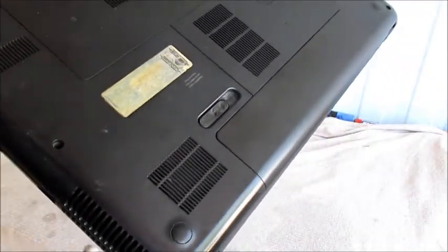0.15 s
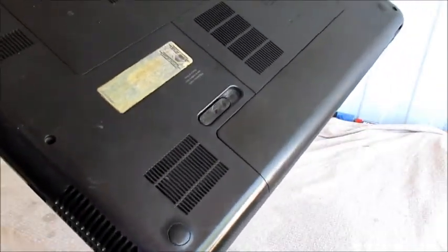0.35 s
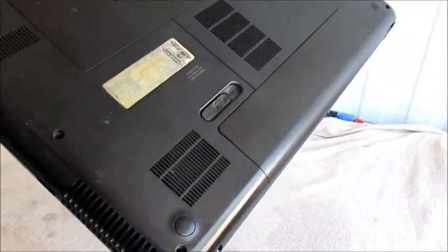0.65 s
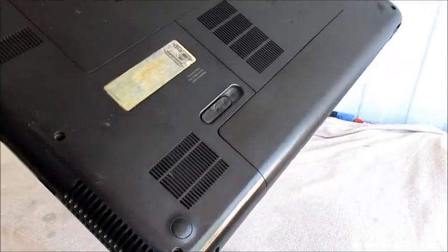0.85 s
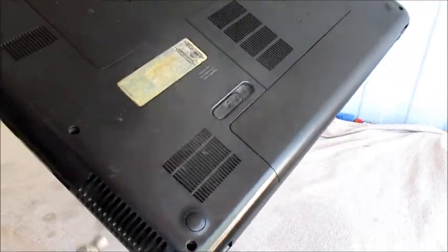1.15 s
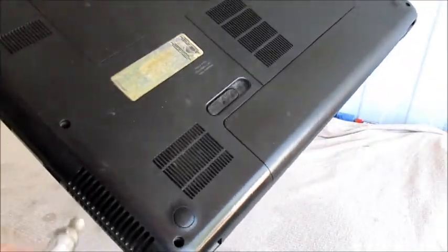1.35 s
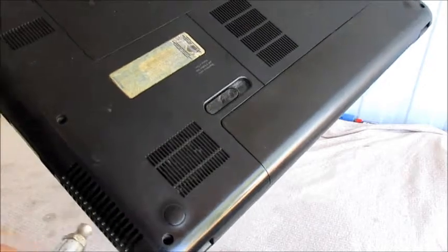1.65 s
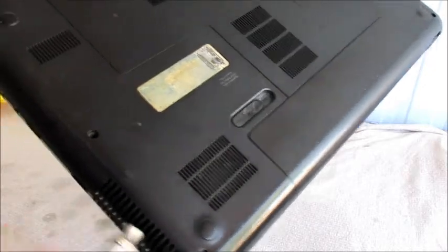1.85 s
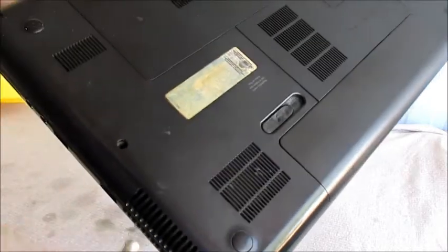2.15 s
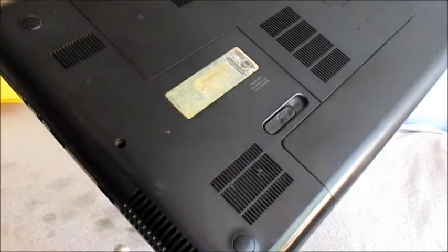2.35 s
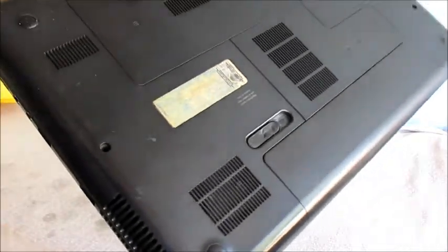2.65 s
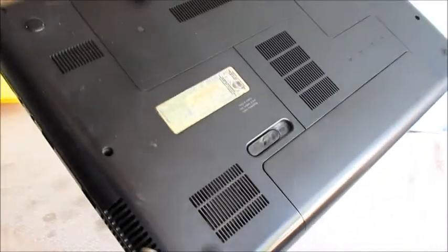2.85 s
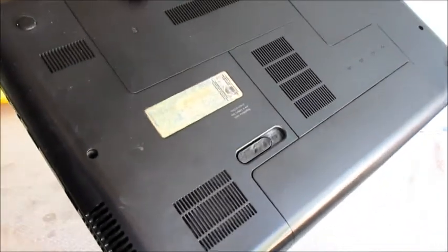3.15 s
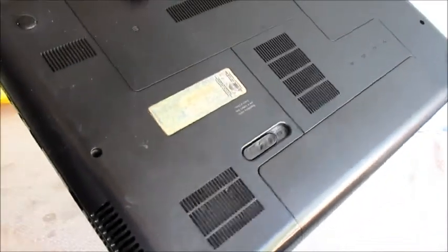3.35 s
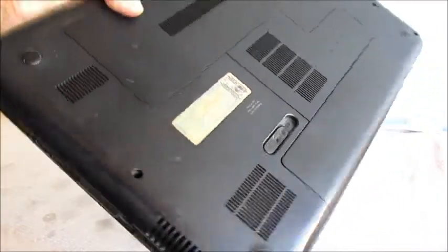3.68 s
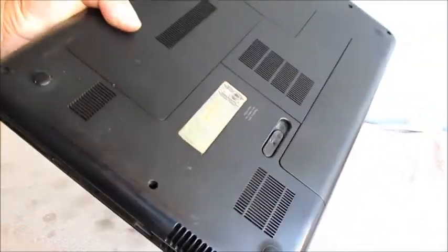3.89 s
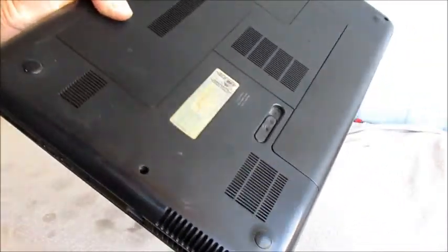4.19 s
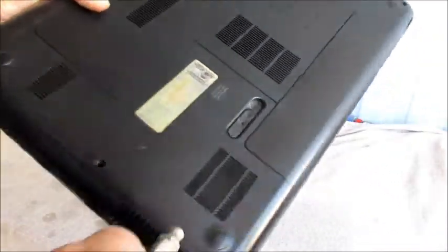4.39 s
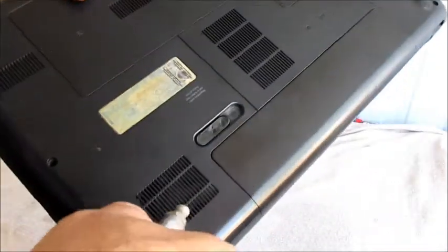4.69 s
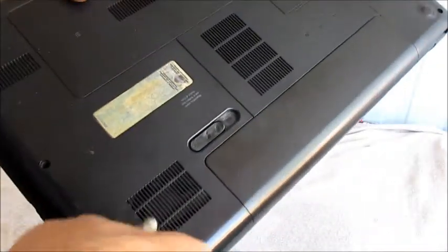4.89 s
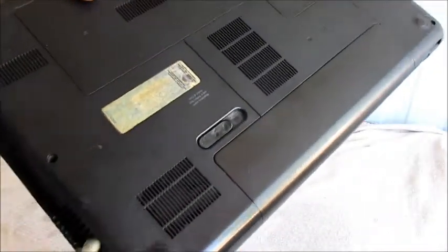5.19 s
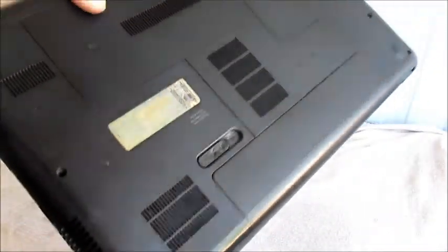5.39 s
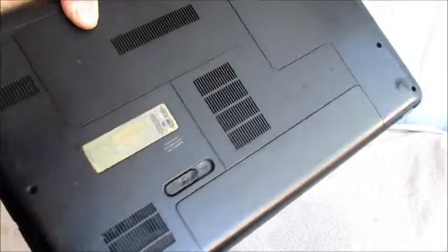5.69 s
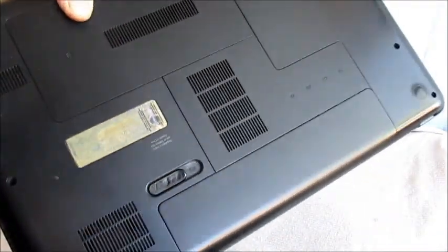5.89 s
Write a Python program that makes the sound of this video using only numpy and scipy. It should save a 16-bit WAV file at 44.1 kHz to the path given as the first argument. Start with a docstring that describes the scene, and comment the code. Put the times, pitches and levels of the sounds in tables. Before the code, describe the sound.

Close in a small room, a compressed-air gun blasts a laptop's vents. The first hiss is already blowing, then five more snap on and cut off abruptly. Each flutters between bright jet hiss, coarse grille rush and hollow roar, with faint gliding whistles. Brief gaps reveal low room tone and a dull hand rub; the final blast is still going at the end.

```python
"""A compressor's blow gun cleans the vents of a laptop, close by, in a small room; the first blast is already blowing.
The free jet hisses, rushes on the vent grille, roars in the hollow case and makes slots ring and whistle, while
spilled air buffets the two microphone ports. Five more blasts follow, with room tone throughout. In the first and
fourth gaps the hand rubs the case; before the fifth and sixth blasts air seeps out. After the long fifth blast the
shell ticks twice; the sixth is still blowing at the end. Air is shaped noise, whistles are gliding sine tones."""
import sys
import numpy as np
from scipy import signal
from scipy.fft import rfft, irfft
from scipy.io import wavfile
from scipy.ndimage import map_coordinates

SR = 44100
rng = np.random.default_rng(int(sys.argv[2]) if len(sys.argv) > 2 else 0)


def log_audio(samples):
    """Write samples as a 16-bit WAV file to the path given in sys.argv[1]."""
    # one column per channel
    frames = np.atleast_2d(samples).T
    # limit to full scale, then quantise
    limited = np.clip(frames, -1, 1)
    pcm = np.round(limited * 32767).astype(np.int16)
    wavfile.write(sys.argv[1], SR, pcm)


N = 265923
TIME, FREQS = np.arange(N) / SR, np.fft.rfftfreq(N, 1 / SR)

# pulls of the trigger: fully_open_s, shuts_s, closing_speed_db_per_s, pressure_kick_db, extra_leak_time_s
TRIGGER_PULLS = [(-.1, 0.539, 640, 0, 0), (0.933, 1.839, 480, 3, 0.0029), (1.95, 2.693, 600, 2, 0.0034),
                 (2.804, 3.523, 800, -0.5, 0.049), (3.871, 5.336, 777, 7, 0.00085),
                 (5.816, 6.104, 700, 0.5, 0.034)]


def valve(open_s=0.0064, kick_s=0.0095, leak_db=-13.5, bleed_db=-7.5, bleed_db_per_s=282.5):
    """Flow of air: the valve leaks, snaps open, spends its stored pressure, holds, shuts and bleeds the barrel empty."""
    flow = 0
    for opens, shuts, closing_db_per_s, kick_db, leak_s in TRIGGER_PULLS:
        since_open = TIME - opens
        since_shut = np.maximum(TIME - shuts, 0)
        opening = np.clip(1 + since_open / open_s, 0, 1) ** 2
        leak = from_db(leak_db) * np.clip(1 + since_open / (leak_s + open_s), 0, 1)
        kick = from_db(kick_db * np.exp(-np.maximum(since_open, 0) / kick_s))
        shutting_db = -closing_db_per_s * since_shut
        emptying_db = bleed_db - bleed_db_per_s * since_shut
        closing = from_db(np.maximum(shutting_db, emptying_db))
        flow = flow + np.maximum(opening, leak) * kick * closing
    return flow


# hiss of the free jet as the nozzle turns, before flow and trim, one curve per blast: time_s, level_db
JET_CURVES = [
    [(0.01, -15), (0.165, -15.2), (0.38, -21.5), (0.455, -21.6), (0.53, -18)],
    [(0.95, -15), (1.21, -17), (1.375, -15.5), (1.62, -16), (1.69, -19), (1.79, -16.6), (1.83, -21.5)],
    [(1.965, -20.5), (2.095, -14.1), (2.155, -19), (2.185, -26), (2.22, -14.5), (2.33, -20), (2.575, -17),
     (2.625, -33), (2.7, -13)],
    [(2.815, -17.5), (2.955, -25.5), (3.03, -17), (3.235, -24), (3.265, -25), (3.46, -22.5), (3.52, -15)],
    [(3.885, -21), (4.135, -28.5), (4.25, -19), (4.33, -21), (4.36, -29.5), (4.58, -20), (4.605, -17.5),
     (4.765, -21.5), (4.825, -17), (4.885, -24.5), (4.985, -17.5), (5.045, -24.5), (5.22, -28.5),
     (5.245, -24), (5.335, -21.5)],
    [(5.825, -19), (6.015, -16)],
]
# the jet sweeps across a vent, levels before flow and trim:
# middle_s, length_s, grille_rush_db, hollow_roar_db, rush_brightness_db
VENT_CROSSINGS = [(0.152, 0.092, -19.5, -31.5, -3), (0.456, 0.16, -21.5, -26.5, -1.5),
                  (0.977, 0.066, -17.5, -31, -4), (1.04, .065, -17, -25, -1), (1.107, 0.053, -24, -44, 17),
                  (1.245, 0.061, -25.5, -32, -13), (1.452, 0.079, -18, -32.5, -0.5),
                  (1.598, 0.12, -23.5, -38, -10), (1.785, 0.023, -22, -31.5, 4),
                  (1.979, 0.073, -15, -21, -3.5), (2.136, 0.049, -17, -27, 9),
                  (2.217, 0.055, -19, -33.5, 0.5), (2.294, 0.095, -21.5, -33, -1.5),
                  (2.51, 0.09, -20, -33, -3), (2.573, 0.047, -16, -31.5, -1.5),
                  (2.68, 0.1, -21.5, -22.5, -2.5), (2.855, 0.078, -15.5, -22.5, -4),
                  (2.926, 0.073, -27, -21.5, -13), (3.028, 0.082, -25, -27.5, -3),
                  (3.10, 0.032, -35, -27, 10), (3.182, 0.099, -27.5, -27.5, -8),
                  (3.513, 0.067, -20.5, -34, -1), (3.915, 0.087, -18.5, -22.5, 6),
                  (4.133, 0.054, -45, -26, -2), (4.164, 0.034, -18.5, -25.5, -1),
                  (4.231, 0.079, -23, -33, 11.5), (4.314, 0.037, -17, -27.5, 6), (4.4, .15, -21, -26, -5),
                  (4.523, 0.13, -30, -25, -13), (4.652, .12, -17.5, -29.5, -3), (4.776, 0.15, -26, -30, -6),
                  (4.896, 0.1, -23, -27.5, -6), (5.017, 0.022, -22.5, -35, -1.5),
                  (5.15, 0.038, -42.5, -34.5, -3), (5.326, 0.086, -21, -23, -9),
                  (5.85, 0.19, -32.5, -35, 42), (5.985, 0.071, -15.5, -24.5, -7.5)]
# deflected air hits the microphone, before flow and flutter: middle_s, length_s, level_db
AIR_GUSTS = [(.16, 0.054, -32.5), (1.02, 0.23, -29.5), (1.11, 0.038, -30), (1.32, 0.07, -34.5),
             (1.46, 0.054, -30), (1.58, 0.059, -38.5), (1.79, 0.019, -34.5), (2.09, 0.12, -35.5),
             (2.58, 0.024, -34), (2.82, 0.059, -35), (4.08, 0.13, -40), (4.98, 0.054, -36.5),
             (5.85, 0.13, -33)]


def air_levels(usual_jet_db=-18):
    """Air always takes all four paths, following the jet; each vent crossing or gust adds a swell of power."""
    jet_db, = in_time([point for blast in JET_CURVES for point in blast])
    extra_db = jet_db - usual_jet_db
    # base level of each other path at the usual jet, and dB gained per dB of the jet
    grille_power = from_db(-24 + 0.79 * extra_db) ** 2
    hollow_power = from_db(-33 + 0.55 * extra_db) ** 2
    steady_spill = from_db(-43 + 1.36 * extra_db)
    # the brightness is an average, weighted by the power of each rush; the steady share has 2 dB
    weighted_brightness = 2 * grille_power
    for s, length, rush_db, roar_db, brightness_db in VENT_CROSSINGS:
        shape = swell(s, length)
        rush_power = (from_db(rush_db) * shape) ** 2
        grille_power = grille_power + rush_power
        hollow_power = hollow_power + (from_db(roar_db) * shape) ** 2
        weighted_brightness = weighted_brightness + brightness_db * rush_power
    spill = np.hypot(steady_spill, swells(AIR_GUSTS))
    brightness = weighted_brightness / grille_power
    return from_db(jet_db), np.sqrt(grille_power), np.sqrt(hollow_power), spill, brightness


# tone colour of the free jet before the case adds its own: pitch_hz, relative_level_db
JET_SPECTRUM = [(1000, -20), (3000, -52), (6000, -10), (8400, 3.5), (10300, -1), (12800, 4), (14200, 4),
                (16000, 1)]


def jet_hiss():
    """Fast air tears into small eddies: a fluttering, treble-heavy hiss."""
    return air(JET_SPECTRUM, trim_db=-0.5, flutter_db=1.12, flutter_rate=24)


# tone colour of air on the grille before the case and brightness change it: pitch_hz, relative_level_db
GRILLE_SPECTRUM = [(1200, -27.5), (2600, -13), (3500, 0), (4500, -0.5), (5800, 4), (7000, 2.5), (9000, 0),
                   (12000, -29.5), (16000, -22.5)]


def grille_rush(brightness_db, pivot_hz=5000):
    """The jet splits on the slats; the shorter its run, the smaller the eddies and the brighter the rush."""
    rush = air(GRILLE_SPECTRUM, trim_db=-1.5, flutter_db=1.0, flutter_rate=25)
    dull = irfft(rfft(rush) / (1 + (FREQS / pivot_hz) ** 8), N)
    bright = rush - dull
    return dull * from_db(-brightness_db / 2) + bright * from_db(brightness_db / 2)


# tone colour of the hollow before the case resonances: pitch_hz, relative_level_db
HOLLOW_SPECTRUM = [(300, -20.5), (700, -12.5), (1050, -11), (1400, -6), (2000, -2.5), (2800, 2),
                   (3600, -3.5), (5000, -12), (9000, -20)]


def hollow_roar():
    """Air roars inside the hollow case, strongest in the middle pitches, with a slower flutter."""
    return air(HOLLOW_SPECTRUM, trim_db=-0.55, flutter_db=0.8, flutter_rate=9.4)


# resonances of the case: pitch_hz, width_hz, lift_db
CASE_RESONANCES = [(1565, 590, 8.5), (3100, 300, 0.5), (3740, 390, 2.5), (5200, 400, 1.5), (6340, 220, 0.5),
                   (8220, 1100, -1.5)]
# likeness of the air noise at the two ports, 1 the same, 0 unrelated, clipped to -1..1: pitch_hz, likeness
PORT_LIKENESS = [(60, -1.4), (400, 10.5), (900, 6.5), (1500, 0.6), (2100, 1.5), (2700, 0), (3700, 2.1),
                 (5500, 0.5), (8000, 0.66), (15000, .66)]


def air(spectrum, trim_db, flutter_db, flutter_rate):
    """One path of the air: eddies make its level flutter, the case colours it."""
    noise = turbulence(over_hz(spectrum) + lift(CASE_RESONANCES), over_hz(PORT_LIKENESS))
    return noise * from_db(trim_db + flutter_db * drift(flutter_rate))


# a slot held under the jet rings broadly, levels before flow: middle_s, length_s, pitch_hz, level_db
RINGING_SLOTS = [(1.98, 0.06, 5400, -26), (3.107, 0.033, 5570, -21.5), (4.168, 0.012, 3600, -29),
                 (4.225, .09, 5600, -27), (4.388, 0.078, 2460, -27), (4.427, 0.11, 3820, -30.5),
                 (5.994, 0.04, 3500, -32)]


def slot_rings(pass_q=3.9):
    """Turbulence sets the air in a single slot ringing: a hoarse band of noise around its pitch."""
    eddies = turbulence(0, over_hz(PORT_LIKENESS))
    out = 0
    for s, length, hz, db in RINGING_SLOTS:
        slot = signal.iirpeak(hz, pass_q, fs=SR)  # applied twice, for a sharper ring
        once = signal.lfilter(*slot, eddies)
        ring = rms_one(signal.lfilter(*slot, once))
        out = out + from_db(db) * swell(s, length) * ring
    return out


# edge tones, before trim and case: start_s, end_s, first_pitch_hz, last_pitch_hz, level_db, overtone_strength_db
WHISTLE_GLIDES = [(0.03, .13, 594, 753, -48, -8), (.15, .33, 627, 1042, -44.5, -15),
                  (.358, .55, 1015, 380, -35.5, 10), (1.588, 1.69, 1060, 1265, -44, -12),
                  (2.27, 2.38, 1075, 1290, -36.5, -14), (2.48, 2.55, 1650, 1660, -37.5, -11),
                  (3.214, 3.37, 665, 570, -45.5, -6), (3.35, 3.545, 586, 668, -47, 4)]
# overtones of an edge tone: multiple_of_pitch, level_db
WHISTLE_OVERTONES = [(2, 0), (3, -3), (4, -6)]


def edge_tones(width_hz=24, breath_share=0.16, trim_db=-1, arch_power=.35, overtone_fade_db=-19):
    """Whistles glide evenly as the nozzle passes a slot; the first case resonance lifts partials that cross it."""
    out = 0
    for multiple, partial_db in [(1, 0)] + WHISTLE_OVERTONES:
        # a slow random part makes each partial breathy; the complex form sways both level and phase
        breath = drift(width_hz * multiple) + 1j * drift(width_hz * multiple)
        waver = np.sqrt(1 - breath_share) + np.sqrt(breath_share / 2) * breath
        partial = np.zeros(N, complex)
        for start, end, first_hz, last_hz, level_db, overtone_db in WHISTLE_GLIDES:
            sounding = (TIME > start) & (TIME < end)
            progress = (TIME[sounding] - start) / (end - start)
            pitch_hz = first_hz * (last_hz / first_hz) ** progress
            phase = 2 * np.pi * np.cumsum(pitch_hz) / SR
            db = level_db + trim_db + partial_db
            if multiple > 1:
                db = db + overtone_db + overtone_fade_db * progress
            arch = np.sin(np.pi * progress) ** arch_power
            partial[sounding] += arch * from_db(db) * np.exp(1j * multiple * phase)
        out = out + np.real(waver * partial)
    return irfft(rfft(out) * from_db(lift(CASE_RESONANCES[:1])), N)


# tone colour of the spilled air: pitch_hz, relative_level_db
SPILL_SPECTRUM = [(20, -8), (50, -8.5), (150, -3.5), (400, -3), (800, -4), (1200, -4.5), (2000, -6.5),
                  (4000, -42)]


def buffet():
    """Spilled air swirls at each port nearly on its own, a little harder on the left."""
    swirl = turbulence(over_hz(SPILL_SPECTRUM), over_hz([(200, -0.3), (700, 0.095)]))
    left_right_db = np.array([[0], [-1.5]])
    return swirl * from_db(2.4 * drift(41) + left_right_db)


# small plastic ticks, before trim: time_s, level_db
SHELL_TICKS = [(5.482, -44), (5.562, -57)]


def ticks(t60=0.033):
    """The plastic shell ticks in the hand: short dying bursts of noise; t60 is the time (s) to fall 60 dB."""
    knocks = 0
    for s, db in SHELL_TICKS:
        fall_db = 60 * np.clip((TIME - s) / t60, 0, 3)
        knocks = knocks + from_db(db - fall_db) * (TIME >= s)
    return knocks * air(GRILLE_SPECTRUM, trim_db=-6, flutter_db=1, flutter_rate=100)


# air seeps from the half-squeezed valve before a blast: middle_s, length_s, level_db
VALVE_SEEPS = [(3.73, 0.14, -61), (5.73, .16, -60)]
# tone colour of the seeping air: pitch_hz, relative_level_db
SEEP_COLOUR = [(1500, -21), (2800, -20), (3400, -1), (3750, 2), (4100, -3), (4500, -11), (9000, -24),
               (16000, -37)]


def seep():
    """A thin, narrow hiss from the valve seat."""
    return swells(VALVE_SEEPS) * turbulence(over_hz(SEEP_COLOUR), .5)


def hand_echo(x, delay_s=.0021, sway=0.117, echo_db=-15):
    """A reflection off the moving hand and gun lays a faint, shifting comb on the sound."""
    delay = delay_s * (1 + sway * drift(1.67))
    return x + from_db(echo_db) * np.array([delayed(channel, delay) for channel in x])


# place of the nozzle: time_s, left_port_lead_microseconds
NOZZLE_PLACE = [(0, 30), (.5, 30), (.95, 30), (1.75, 42), (1.97, 17), (2.13, 39), (2.27, 20), (2.65, 23),
                (3.1, 18), (3.3, 28), (3.9, 23), (4.8, 12), (5.0, 23), (5.08, 38), (5.24, 29), (5.32, 31),
                (5.9, 24), (6.02, 46)]


def place(jet, grille, hollow, jet_weight=3, vent_shift_us=-22.5):
    """Lead of the left port in microseconds: the sound moves right, from nozzle to vents, as they take over."""
    nozzle_us, = in_time(NOZZLE_PLACE)
    vents = grille ** 2 + hollow ** 2
    return nozzle_us + vent_shift_us * vents / (vents + jet_weight * jet ** 2)


# level between the ports, before the pan by place: pitch_hz, left_minus_right_db
PORT_BALANCE = [(60, -2.5), (350, -4), (750, -2), (1150, -7), (1900, 0.5), (2700, -6), (3400, 0),
                (4200, -2.5), (5500, -0.5), (7500, 1.5), (9000, 2), (11000, 5.5), (13000, 2.5), (15500, -1)]
# the way round the microphone's housing turns the phase, on top of the lead: pitch_hz, left_lead_radians
HOUSING_PHASE = [(800, 0.42), (1200, 0.75), (2000, -0.33), (2350, -0.88), (3000, 0.62), (3800, 0.63),
                 (4600, 0.65), (5400, 0.5), (6100, 1.02), (7200, 0.39), (9400, 0.42), (11000, 0.15),
                 (15000, -0.69)]


def at_ports(x, lead_us, centre_us=16, pan_db_per_us=0.07):
    """Lead sets the right port's delay and the loudness balance; the housing shades and delays each port."""
    half = np.array([[.5], [-.5]])
    pair = np.array([x[0], delayed(x[1], lead_us / 1e6)])
    pair = pair * from_db(half * pan_db_per_us * (lead_us - centre_us))
    shade = from_db(half * over_hz(PORT_BALANCE))
    turn = np.exp(1j * half * over_hz(HOUSING_PHASE))
    return irfft(rfft(pair) * shade * turn, N)


def room(x, t60, wet_db):
    """A short diffuse tail, different at each port; t60 is the time (s) to fall 60 dB."""
    t = TIME[:SR // 2]
    tail = rng.standard_normal((2, len(t))) * from_db(-60 * t / t60) * (t > .003)
    tail /= np.sqrt(np.sum(tail ** 2, axis=1, keepdims=True))
    return x + from_db(wet_db) * signal.fftconvolve(x, tail, axes=1)[:, :N]


# the hand shifts on the case: middle_s, length_s, level_db
HAND_RUBS = [(.74, 0.41, -47.5), (3.74, 0.12, -49)]
# tone colour of the rub: pitch_hz, relative_level_db
RUB_SPECTRUM = [(30, -7), (70, 3), (130, -4.5), (250, 0), (500, -12), (1500, -27), (5000, -63)]


def hand_rubs():
    """The hand shifting on the case makes a dull, low rub."""
    return swells(HAND_RUBS) * turbulence(over_hz(RUB_SPECTRUM), 0.77)


# tone colour of the room before the hiss peaks: pitch_hz, relative_level_db
ROOM_SPECTRUM = [(20, -8), (60, 2.5), (130, -6.5), (210, -0.5), (400, -5.5), (600, -9), (1200, -15),
                 (2200, -22), (3600, -23), (4500, -37.5), (7000, -35), (10500, -47), (13300, -56.5),
                 (14800, -20.5), (16000, -18)]
# peaks in the background hiss: pitch_hz, width_hz, lift_db
BACKGROUND_PEAKS = [(4940, 560, 13), (7260, 400, 1.5), (8520, 2200, 25), (12000, 640, 25)]


def room_tone(level_db=-50):
    """Steady low room noise with a thin hiss on top."""
    likeness = over_hz([(100, 0.73), (500, 0.85), (2000, 0.24), (8000, 0.26)])
    return from_db(level_db) * turbulence(over_hz(ROOM_SPECTRUM) + lift(BACKGROUND_PEAKS), likeness)


def turbulence(db, likeness):
    """Stereo noise of a given spectrum, partly shared by both ports; rms 1."""
    mid, side = rfft(rng.standard_normal((2, N)))
    alike = np.clip(likeness, -1, 1)
    pair = np.sqrt(1 + alike) * mid + np.sqrt(1 - alike) * side * [[1], [-1]]
    return rms_one(irfft(from_db(db) * pair, N))


def drift(rate):
    """Slow chance of spread 1, changing about rate times a second."""
    return rms_one(irfft(rfft(rng.standard_normal(N)) / (1 + (FREQS / rate) ** 2), N))


def swell(middle_s, length_s, squareness=3.32):
    """A smooth rise and fall of height 1, length_s wide at half power; squareness 2 is a bell, more is flatter."""
    distance = np.abs(2 * (TIME - middle_s) / length_s)
    return np.sqrt(.5 ** np.minimum(distance ** squareness, 200))


def swells(rows):
    """Joint amplitude of unrelated swells, given as middle_s, length_s, level_db."""
    return np.sqrt(sum((from_db(db) * swell(s, length)) ** 2 for s, length, db in rows))


def lift(resonances):
    """dB that a set of resonances adds at each frequency."""
    return sum(db / (1 + (2 * (FREQS - hz) / width) ** 2) for hz, width, db in resonances)


def over_hz(points):
    """A table joined by straight lines over log frequency."""
    hz, value = np.transpose(points)
    return np.interp(np.log(FREQS + 1), np.log(hz), value)


def in_time(rows):
    """Each column of a curve at every sample."""
    s, *columns = np.transpose(rows)
    return [np.interp(TIME, s, c) for c in columns]


def delayed(x, seconds):
    """The sound read later by a delay that may change, smoothly between samples."""
    return map_coordinates(x, [np.arange(N) - seconds * SR], order=5, mode="nearest")


def from_db(db):
    """Amplitude for a level in dB."""
    return 10 ** (np.asarray(db) / 20)


def rms_one(x):
    """The sound scaled to an rms of 1."""
    return x / np.sqrt(np.mean(x ** 2) + 1e-20)


def scene():
    """Flow drives every path of the air; the sources are placed at the ports, then get the room around them."""
    flow = valve()
    jet, grille, hollow, spill, brightness_db = air_levels()
    vents = grille * grille_rush(brightness_db) + hollow * hollow_roar()
    # the hiss fades faster than the flow: the sound dulls as the pressure falls
    blast = flow ** 1.24 * jet * jet_hiss() + flow * (vents + slot_rings())
    sources = hand_echo(blast) + edge_tones() + ticks() + seep()
    near = at_ports(sources, place(jet, grille, hollow))
    reverberant = room(near, t60=.17, wet_db=-17)
    return reverberant + flow * spill * buffet() + hand_rubs() + room_tone()


def record(dry):
    """A narrow notch in the treble, and the top is cut."""
    notched = signal.lfilter(*signal.iirnotch(7900, 40, fs=SR), dry)  # Hz, sharpness
    top_cut = signal.ellip(12, .1, 70, 15850, fs=SR, output="sos")  # order, ripple dB, depth dB, Hz
    return signal.sosfilt(top_cut, notched)


dry = scene()
out = record(dry)
log_audio(out)
```